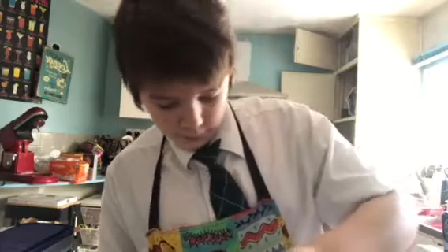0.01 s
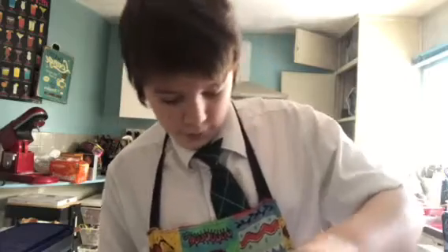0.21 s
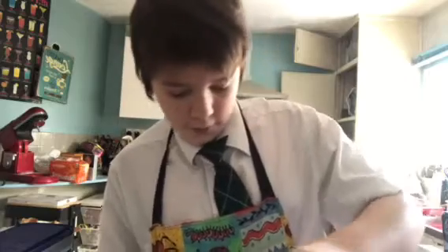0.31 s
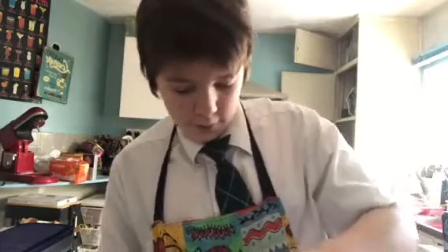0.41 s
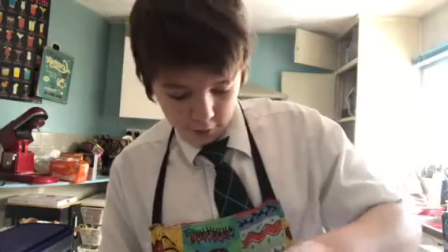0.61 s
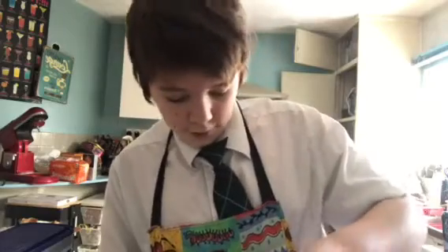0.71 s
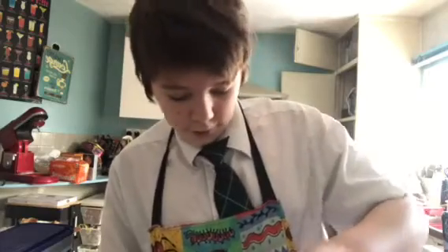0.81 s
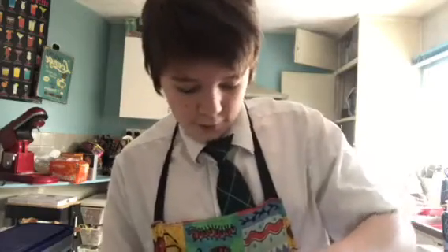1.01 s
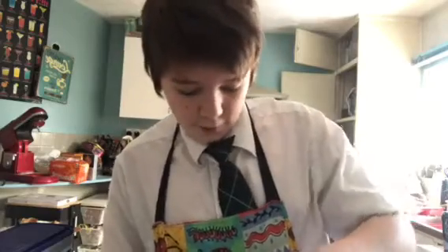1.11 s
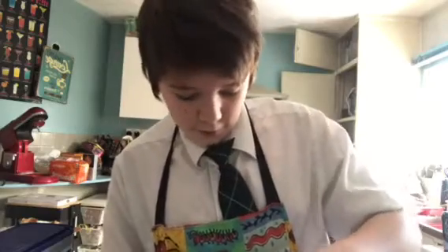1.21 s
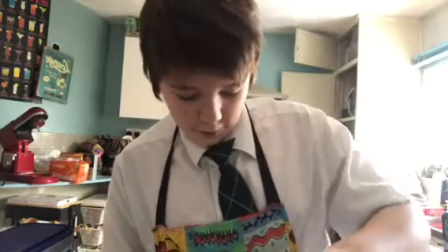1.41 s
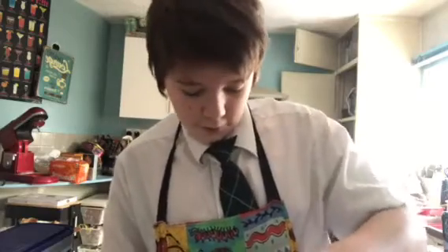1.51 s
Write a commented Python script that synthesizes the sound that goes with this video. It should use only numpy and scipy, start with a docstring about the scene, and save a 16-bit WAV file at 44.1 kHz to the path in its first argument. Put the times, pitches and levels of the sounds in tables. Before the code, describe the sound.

Uneven spoon knocks on a ceramic mug, hollow and quickly damped, with slight rubbing, sticky pops and faint squelches of batter; one hit dominates early, the rest are quiet, with a short room tail and soft low room noise.

```python
"""A kitchen worktop in a small, quiet room: a metal spoon stirs thick batter in a ceramic mug.
Clinks layer damped spoon modes with noise bursts for the clack of the glaze and a fine crack.
Hollow knocks are damped modes of mug and worktop; low rings and dull bumps are single damped modes.
Rubs are roughened tones with grit; pops, crackle, squelches and faint scrapes are shaped noise bands.
A short room tail follows the stirring, over soft room noise and a mains hum."""
import sys
import numpy as np
from scipy import signal
from scipy.fft import rfft, irfft
from scipy.io import wavfile

SR = 44100
rng = np.random.default_rng(int(sys.argv[2]) if len(sys.argv) > 2 else 0)


def file_out(sig):
    """Save sig as 16-bit WAV at sys.argv[1]."""
    # one column per channel
    cols = np.atleast_2d(sig).T
    # limit, then scale
    lim = np.clip(cols, -1, 1)
    pcm = np.round(lim * 32767).astype(np.int16)
    wavfile.write(sys.argv[1], SR, pcm)


N = 70560  # samples, 1.6 s
T = np.arange(N) / SR  # time axis, s
HZ = np.maximum(np.arange(N // 2 + 1) * SR / N, 1)  # frequency axis, Hz


def amp(db):
    """Decibels to gain."""
    return 10 ** (np.asarray(db) / 20)


def colour(points):
    """Gain per frequency from (f/Hz, level/dB) points, joined on a log frequency axis."""
    hz, db = np.array(points).T
    return amp(np.interp(np.log(HZ), np.log(hz), db))


def hump(hz, octaves):
    """Gain of a broad resonance: a bell on a log frequency axis, width as one standard deviation."""
    return np.exp(-0.5 * (np.log2(HZ / hz) / octaves) ** 2)


def noise(gain):
    """Noise of rms 1 with the given colour."""
    x = irfft(rfft(rng.standard_normal(N)) * gain, N)
    return x / x.std()


def envelope(rise, hold, t60):
    """Linear rise, hold and exponential release."""
    attack = np.minimum(T / max(rise, 1 / SR), 1)
    release_time = np.maximum(T - rise - hold, 0)
    return attack * np.exp(-np.log(1000) * release_time / t60)


def swell(length):
    """A rounded stroke of the given length."""
    arch = np.abs(np.sin(np.pi * np.minimum(T / length, 1)))
    return np.sqrt(arch) * (T < length)


def ring(modes, rise, hold):
    """Damped modes set going by one contact."""
    out = 0
    for hz, db, t60 in modes:
        out = out + amp(db) * np.sin(2 * np.pi * hz * T) * envelope(rise, hold, t60)
    return out


def at(s, x):
    """The sound x, starting at time s."""
    start = int(np.clip(s * SR, 0, N - 1))
    return np.concatenate([np.zeros(start), x[:N - start]])


# Colour of the soft room noise: f/Hz, level/dB (relative)
FLOOR_COLOUR = [(20, -42), (31, -26.5), (39, -8.5), (48, 3), (65, 0.5), (100, 2.5), (160, -5.5),
                (300, -1.5), (500, -3.5), (800, -10.5), (1300, -13.5), (2000, -18), (3000, -23),
                (7000, -24.5), (11000, -31), (15500, -31)]
FLOOR_DB, HUM_HZ, HUM_DB = -62.5, 98.4, -69


def room_floor():
    """Steady coloured noise with a mains hum as one low sine."""
    hum = np.sin(2 * np.pi * HUM_HZ * T)
    return amp(FLOOR_DB) * noise(colour(FLOOR_COLOUR)) + amp(HUM_DB) * hum


# Hollow knocks of the mug: t/s, level/dB, f/Hz, rise/s, hold/s,
# then relative to the knock: wall level/dB, low mode level/dB, worktop level/dB
MUG_KNOCKS = [(0, -44, 559, 0.00064, 0.0029, -10.5, -18, -12),
              (0.0703, -39, 555, 0.0021, 0.01, -24, -8.5, -8),
              (0.2441, -8, 561, 0.003, 0.0081, -15, -14, 1),
              (0.284, -45, 520, 0.0018, .001, -30, -12, -14.5),
              (0.309, -32.5, 575, 0.0029, 0.0017, -36, -19, 1),
              (0.4361, -20, 546.8, 0.003, 0.014, -23.5, -3, -1.5),
              (0.488, -32.5, 565, 0.0035, 0.013, -33, -18, -10),
              (0.556, -42.5, 558, 0.0013, 0.014, -27.5, -18, -9.5),
              (.694, -50.5, 539, .004, 0.0091, -13, -13, -1), (0.78, -36, 563, 0.0027, 0.0032, -20, -7, 11),
              (.817, -41.5, 558, 0.0092, 0.0049, -28, -28, -18),
              (1.0549, -31.5, 605, 0.0018, 0.0033, -19.5, -4.5, 6),
              (1.063, -30, 557, 0.004, 0.0081, -18, -12, -9.5),
              (1.113, -42, 553, 0.0032, 0.013, -14, -13.5, 10),
              (1.196, -38.5, 565, 0.0029, 0.002, -15.5, -7, -12),
              (1.363, -48, 543, 0.0085, 0.012, -11.5, -1, -11),
              (1.461, -36.5, 563.5, 0.0073, 0.012, -17, -3.5, -14),
              (1.527, -52.5, 543, 0.0027, 0.017, -16, -11, -3)]
# Modes of the mug wall: f/Hz, level/dB, t60/s
MUG_WALL_MODES = [(760, -7.5, 0.041), (975, 0, 0.032), (1112, -15, 0.012), (1370, -4, 0.017),
                  (1517, -12, .04)]
# Low modes of the mug: f/Hz, level/dB, t60/s
MUG_LOW_MODES = [(333, -22, 0.076), (425.2, -6, 0.096), (475.3, -4.5, 0.036)]
# Modes of the worktop: f/Hz, level/dB, t60/s
WORKTOP_MODES = [(87.1, -37, 0.5), (209, -51, .35), (469, -41.5, 1)]
HOLLOW_T60_S = 0.045
WALL_RISE_SHARE = 0.32  # of the hollow's rise time


def knocks():
    """The spoon's cushioned push sounds the hollow of the mug, its wall and the worktop beneath."""
    out = 0
    low = ring(MUG_LOW_MODES, 0.0047, 0.003)
    worktop = ring(WORKTOP_MODES, 0.0023, 0)
    for s, db, hz, rise, hold, wall_db, low_db, worktop_db in MUG_KNOCKS:
        hollow = ring([(hz, 0, HOLLOW_T60_S)], rise, hold)
        wall = ring(MUG_WALL_MODES, WALL_RISE_SHARE * rise, 0.0005)
        knock = hollow + amp(wall_db) * wall + amp(low_db) * low + amp(worktop_db) * worktop
        out = out + at(s, amp(db) * knock)
    return out


# Rubs of the spoon along the wall: t/s, length/s, level/dB, f/Hz
SPOON_RUBS = [(0.017, 0.079, -47.5, 542.3), (0.353, 0.046, -63, 535), (0.502, 0.043, -40, 560),
              (0.563, 0.048, -42.5, 550), (0.832, 0.047, -44, 551.7), (0.964, 0.032, -58, 535),
              (1.319, 0.0244, -61, 546), (1.087, 0.023, -39, 543.4), (1.127, 0.071, -51.5, 543.4)]
RUB_ROUGH, RUB_WIDTH_HZ = 0.3, 80  # depth and bandwidth of the unevenness
RUB_GRIT_DB = -11.5  # relative to the rub


def rubs():
    """Friction keeps the hollow sounding unevenly, with a little grit."""
    out = 0
    grit = noise(colour([(100, -9), (300, 0.5), (410, 9.5), (750, 0.5),
                         (1400, -13), (2400, -22), (3500, -30), (16000, -36.5)]))
    slow = 1 / (1 + (HZ / RUB_WIDTH_HZ) ** 4)
    wobble, stutter = noise(slow), noise(slow)
    for s, length, db, hz in SPOON_RUBS:
        phase = 2 * np.pi * hz * T
        # uneven sine and cosine parts vary both strength and phase
        tone = (1 + RUB_ROUGH * stutter) * np.sin(phase) + RUB_ROUGH * wobble * np.cos(phase)
        out = out + amp(db) * at(s, swell(length)) * (tone + amp(RUB_GRIT_DB) * grit)
    return out


# Sticky pops of the batter: t/s, level/dB, centre f/Hz, width/octaves
BATTER_POPS = [(0.0357, -60, 6000, 0.59), (0.2043, -66.5, 6930, 0.28), (0.212, -63.5, 7500, 0.35),
               (0.42, -60, 4280, 0.097), (0.432, -29.5, 760, 0.1), (0.501, -56.5, 3800, 0.79),
               (0.544, -59.5, 6500, 0.67), (0.565, -63, 4930, 0.58), (.5955, -65, 6850, .8),
               (0.74, -44.5, 2010, 1.05), (.868, -76, 6040, 0.46), (.946, -67, 8170, .7),
               (1.1197, -61.5, 5200, .5), (1.338, -68, 7540, 0.71), (1.366, -66, 5200, 0.6),
               (1.4614, -63.5, 4900, 0.47)]
POP_T60_S = 0.034


def pops():
    """Air pockets pop: sudden, fading bursts of noise, each in its own band."""
    out = 0
    burst = envelope(0.00014, 0, POP_T60_S)
    for s, db, hz, width in BATTER_POPS:
        out = out + amp(db) * at(s, burst) * noise(hump(hz, width))
    return out


# Spoon touches the wall: t/s, rise/s, bright ring level/dB, low ring level/dB, clack level/dB
SPOON_CLINKS = [(.038, 0.0021, -60.5, -58.5, -68), (0.065, 0.0025, -69, -62.5, -74),
                (0.2383, 0.002, -27.5, -28.5, -22), (0.4196, 0.0055, -49.5, -70, -62),
                (0.515, 0.017, -63, -71, -83), (0.774, 0.0051, -57.5, -57, -56),
                (.868, 0.0024, -81, -63.5, -88), (1.0499, 0.0037, -53.5, -51.5, -51),
                (1.139, 0.0034, -68, -59, -59), (1.193, 0.0034, -72, -87, -59),
                (1.462, 0.0038, -61, -52.5, -60), (1.481, 0.0016, -64, -71, -58)]
# Bright modes of the spoon: f/Hz, level/dB, t60/s
SPOON_HIGH_MODES = [(4173, -20, 0.086), (4270, -13.5, 0.024), (5167, -14.5, 0.043), (6580, -7, 0.014),
                    (6770, -1, 0.029), (6750, -10, .018), (8730, -20.5, 0.041), (9520, -19.5, 0.054),
                    (11900, -33, .035), (12400, -24, .035)]
# Low modes of the spoon: f/Hz, level/dB, t60/s
SPOON_LOW_MODES = [(2208, -7, .05), (2339, -1, 0.048), (2396, -2.5, 0.023), (2522, -11, .04),
                   (2893, -16, 0.077)]
# Colour of the ceramic clack: f/Hz, level/dB (relative)
CLACK_COLOUR = [(300, -36.5), (900, 11), (1500, 8), (2200, 2), (2700, 1), (3300, -17), (5000, -9.5),
                (7500, -17.5), (10000, -40), (12500, -17.5), (13500, -34), (16000, -30)]
CLINK_HOLD_S, CLACK_T60_S = 0.00039, 0.03
SPOON_ROUGH, CHATTER_HZ = 0.49, 300  # depth and bandwidth of the chatter
CRACK_DB, CRACK_HZ, CRACK_T60_S = -12, 9000, 0.013  # level relative to the clack


def clinks():
    """A fine crack, the spoon's damped, chattering ring and the dry clack of the glaze."""
    out = 0
    clack = noise(colour(CLACK_COLOUR))
    crack = noise(hump(CRACK_HZ, 0.48))
    chatter = 1 + SPOON_ROUGH * noise(1 / (1 + (HZ / CHATTER_HZ) ** 2))
    for s, rise, high_db, low_db, clack_db in SPOON_CLINKS:
        bright_ring = amp(high_db) * ring(SPOON_HIGH_MODES, rise, CLINK_HOLD_S)
        low_ring = amp(low_db) * ring(SPOON_LOW_MODES, rise, CLINK_HOLD_S)
        glaze = clack * at(s, envelope(rise, CLINK_HOLD_S, CLACK_T60_S))
        glaze = glaze + amp(CRACK_DB) * crack * at(s, envelope(0.00029, 0, CRACK_T60_S))
        out = out + chatter * at(s, bright_ring + low_ring) + amp(clack_db) * glaze
    return out


CRACKLE_PER_S, CRACKLE_DB = 8.3, -72.5  # average rate and overall gain


def crackle():
    """Tiny bubbles burst at random times and strengths as short bursts of bright noise."""
    strengths = amp(3 * rng.standard_normal(N))  # 3 dB spread
    bubbles = (rng.random(N) < CRACKLE_PER_S / SR) * strengths
    bursts = signal.fftconvolve(bubbles, envelope(0.0002, 0, 0.012))[:N]
    return amp(CRACKLE_DB) * bursts * noise(hump(7000, 0.84))


# Batter squelches and faint spoon scrapes: t/s, length/s, level/dB, centre f/Hz, width/octaves
SQUELCHES_AND_SCRAPES = [(0.187, 0.018, -65.5, 1960, 0.7), (0.223, 0.045, -46.5, 1300, 0.85),
                         (0.269, 0.051, -48, 1860, 0.38), (0.315, 0.086, -63, 2200, 0.14),
                         (0.418, 0.032, -52, 800, 1), (0.447, 0.15, -63, 2220, 0.31),
                         (0.459, 0.099, -59.5, 1110, 0.27), (0.68, .016, -58.5, 1280, 0.76),
                         (0.725, 0.029, -63, 2200, 0.37), (1.052, 0.0098, -45.5, 740, 0.24),
                         (1.077, 0.087, -62.5, 1205, 0.2), (1.09, 0.077, -63.5, 2370, 0.11),
                         (1.179, 0.03, -57.5, 1296, 0.12), (1.312, 0.018, -67.5, 1400, 0.24),
                         (1.404, .03, -67.5, 1380, 0.32), (1.509, 0.02, -64.5, 2140, 0.42)]
GRAIN_DB = 2.5  # rms swing of the grain level


def squelches_and_scrapes():
    """Batter squelches and faint spoon scrapes: grainy, rounded strokes of banded, fluttering noise."""
    out = 0
    grain = amp(GRAIN_DB * noise(hump(200, 1)))
    grain = grain / np.sqrt(np.mean(grain ** 2))
    for s, length, db, hz, width in SQUELCHES_AND_SCRAPES:
        out = out + amp(db) * at(s, swell(length)) * noise(hump(hz, width))
    return grain * out


# Low rings after the knocks, and dull bumps (several rows may share one blow):
# t/s, level/dB, f/Hz, t60/s
LOW_RINGS_AND_BUMPS = [(0.436, -48, 231.7, 0.31), (0.437, -40, 169.5, 0.091), (0.548, -41.5, 349, 0.05),
                       (.55, -58, 230.5, 0.47), (0.593, -44.5, 400, 0.12), (0.85, -65, 395, 0.031),
                       (.874, -48, 421, 0.053), (1.055, -41, 266.5, 0.067), (1.214, -46, 400, 0.066),
                       (1.485, -42.5, 368, 0.023), (1.529, -51, 100.3, 0.17)]
LOW_RISE_S = 0.0033


def low_rings_and_bumps():
    """Low rings after the knocks, and dull bumps: each row is one low damped mode."""
    out = 0
    for s, db, hz, t60 in LOW_RINGS_AND_BUMPS:
        out = out + at(s, ring([(hz, db, t60)], LOW_RISE_S, 0))
    return out


# Colour of the room tail: f/Hz, level/dB
ROOM_COLOUR = [(80, -25), (250, -3), (550, -19.5), (800, -11.5), (1600, -9.5), (2150, -7), (2400, -7),
               (4000, -14), (6000, -9.5), (6800, -17), (7600, -9.5), (10000, -15.5), (16000, -20.5)]
ROOM_DELAY_S, ROOM_T60_S = 0.0059, 0.23


def kitchen(x):
    """A short, dense tail from cupboards and walls: decaying coloured noise as the echo."""
    tail = rng.standard_normal(N) * at(ROOM_DELAY_S, envelope(0.004, 0, ROOM_T60_S))
    tail = tail / np.sqrt(np.sum(tail ** 2))  # unit energy before colouring
    tail = irfft(rfft(tail) * colour(ROOM_COLOUR), N)
    return x + signal.fftconvolve(x, tail[:N // 2])[:N]


def scene():
    """Stirring in the room, over soft room noise and a mains hum."""
    mug = knocks() + clinks() + low_rings_and_bumps()
    stirring = mug + rubs() + pops() + crackle() + squelches_and_scrapes()
    return (room_floor() + kitchen(stirring))[None]


TOP_HZ = 16000


def record(dry):
    """The recorder cuts the top with a steep low-pass."""
    low_pass = signal.ellip(10, 0.2, 80, TOP_HZ, fs=SR, output="sos")
    return signal.sosfilt(low_pass, dry)


dry = scene()
out = record(dry)
file_out(out)
```